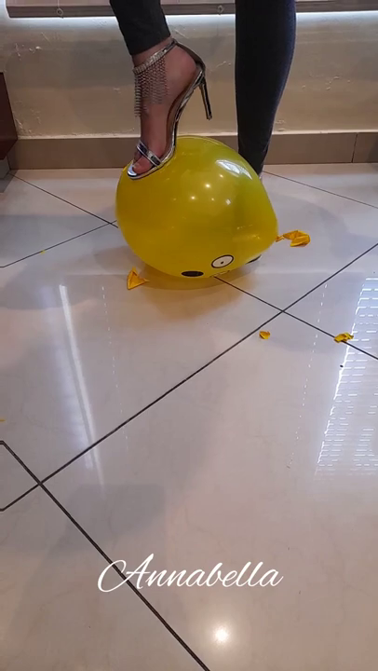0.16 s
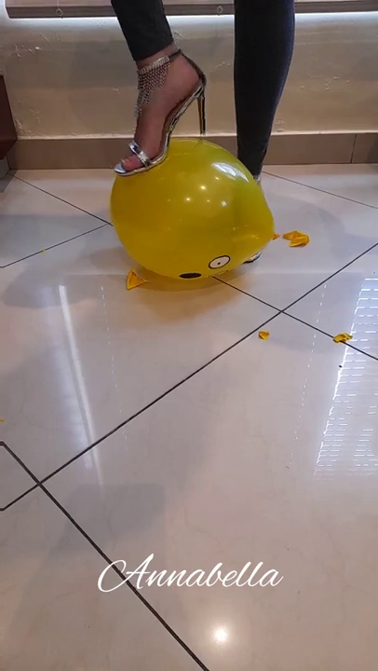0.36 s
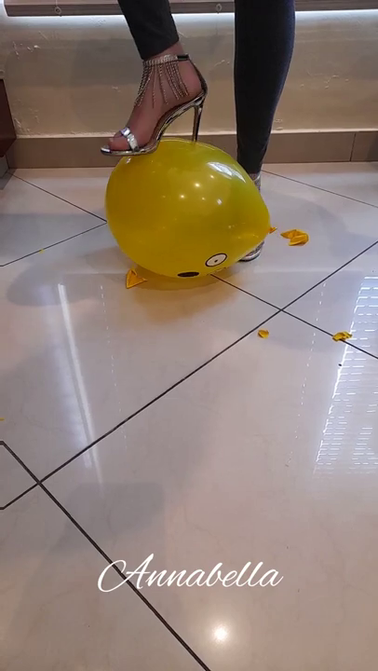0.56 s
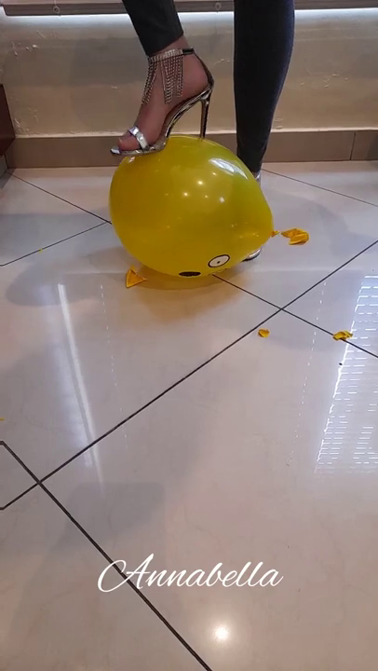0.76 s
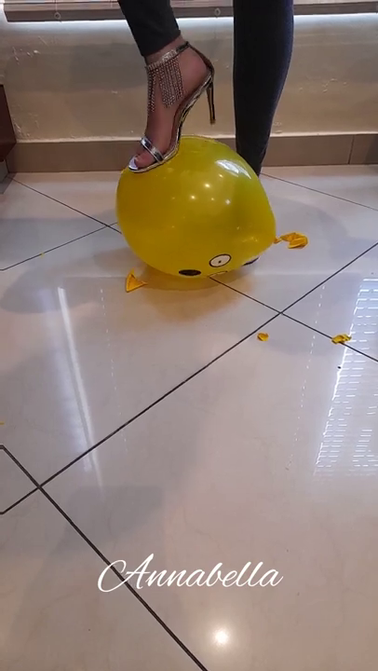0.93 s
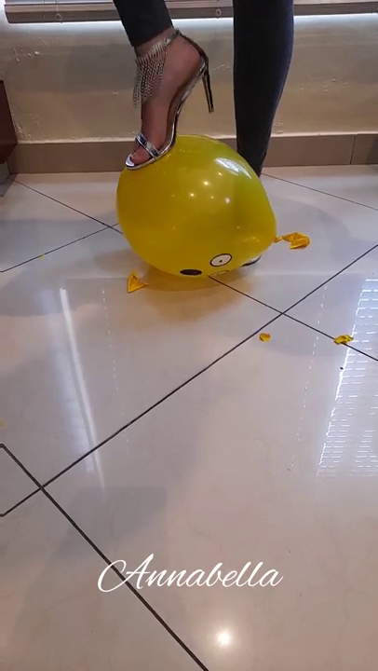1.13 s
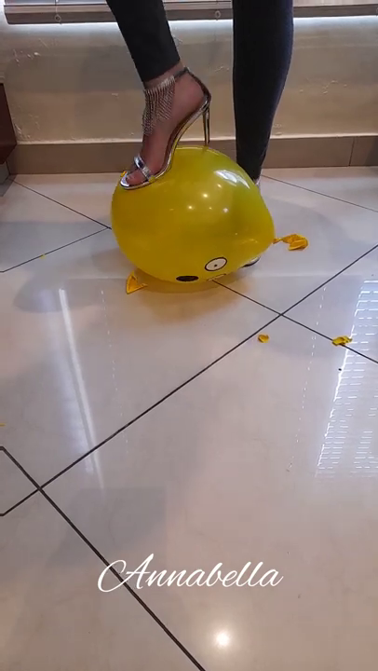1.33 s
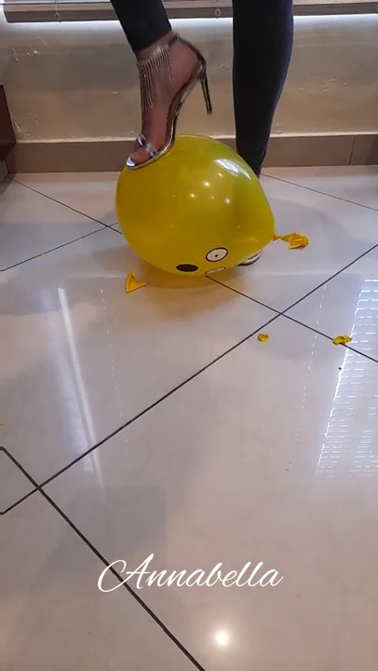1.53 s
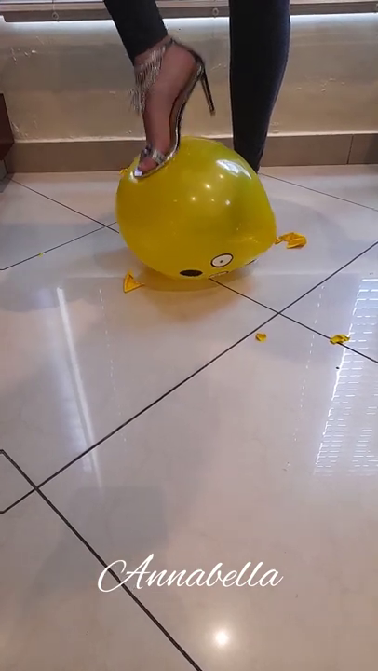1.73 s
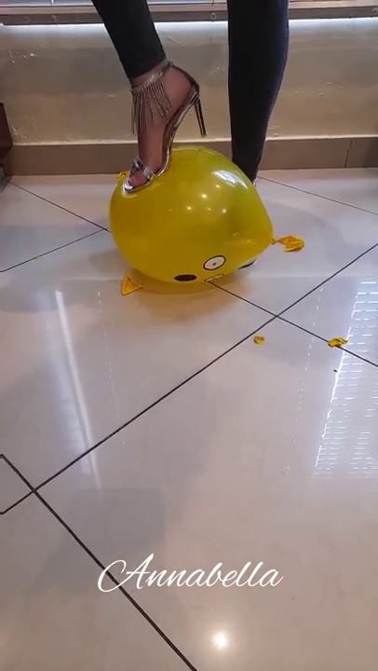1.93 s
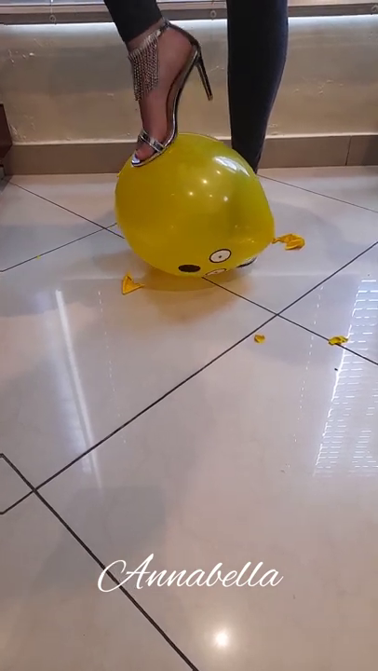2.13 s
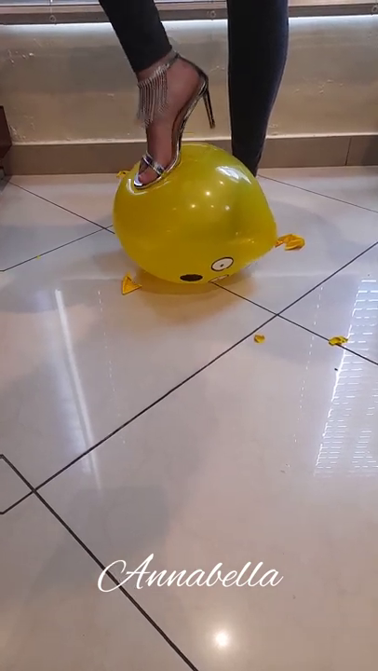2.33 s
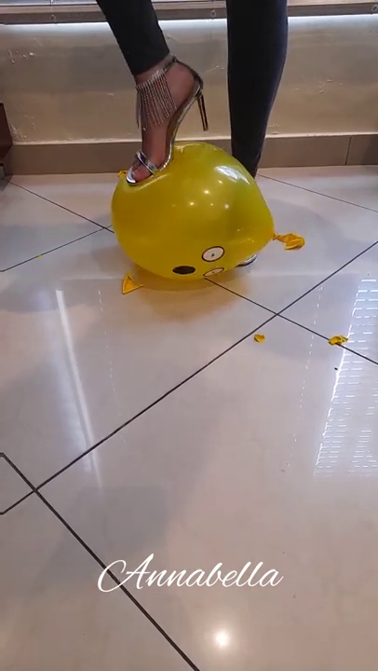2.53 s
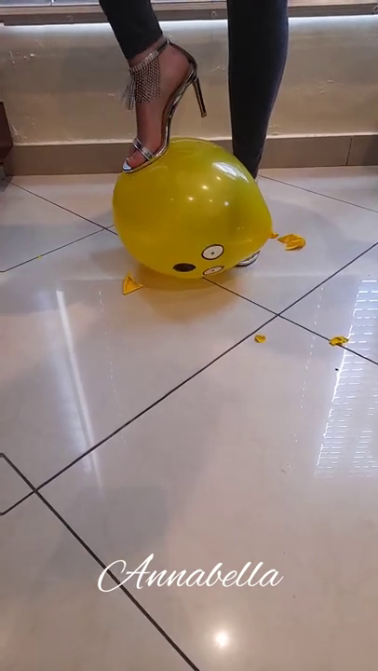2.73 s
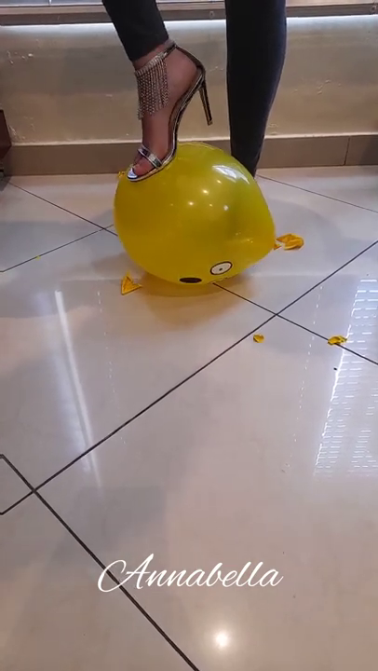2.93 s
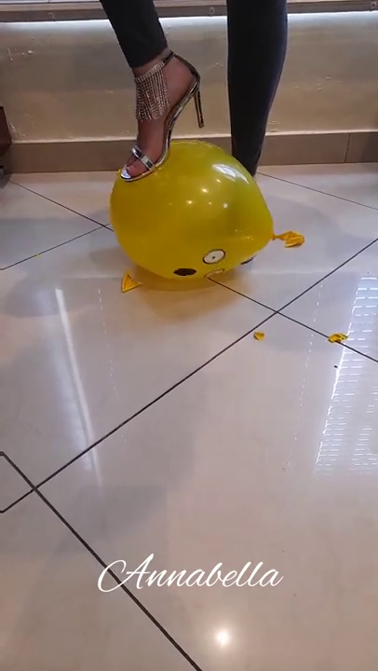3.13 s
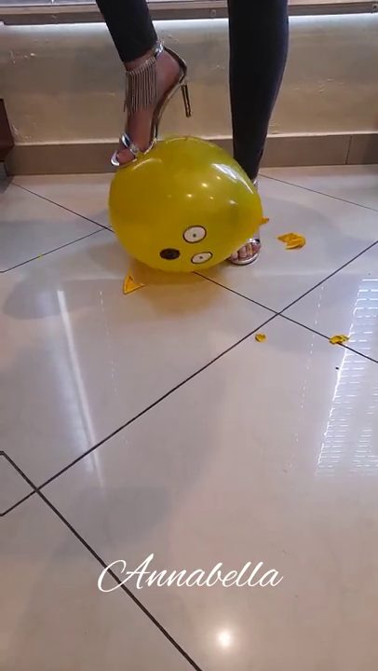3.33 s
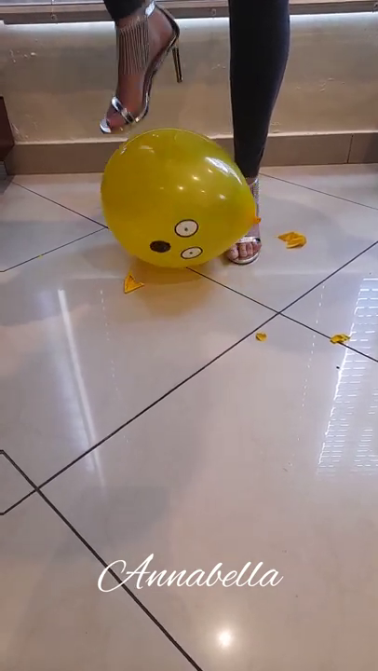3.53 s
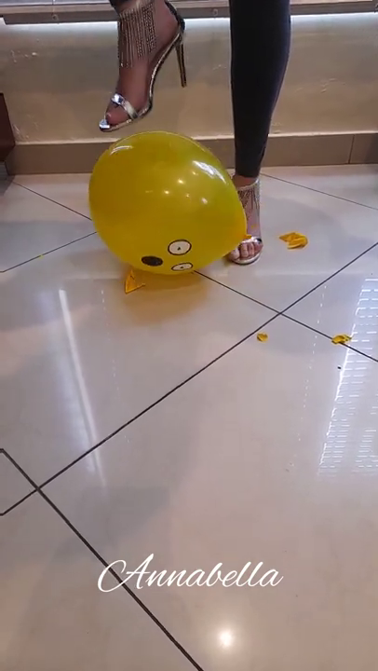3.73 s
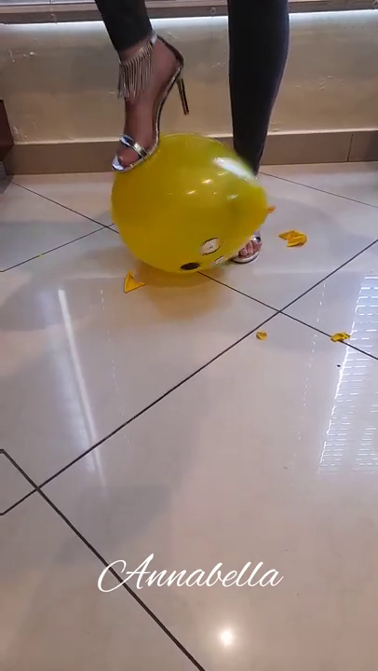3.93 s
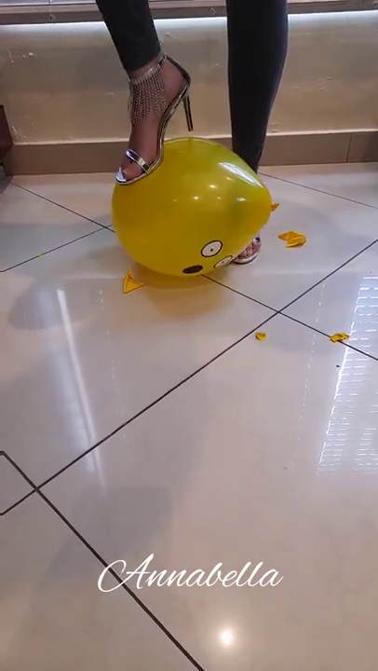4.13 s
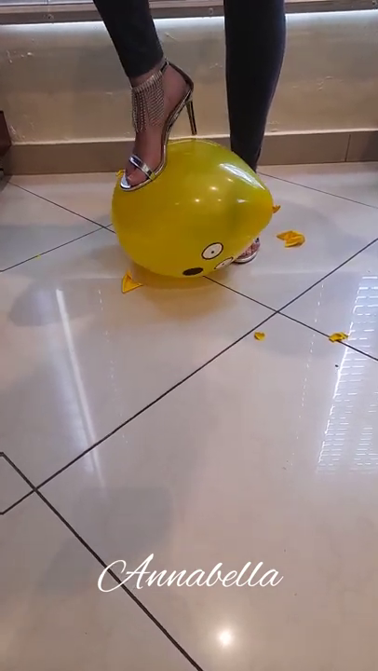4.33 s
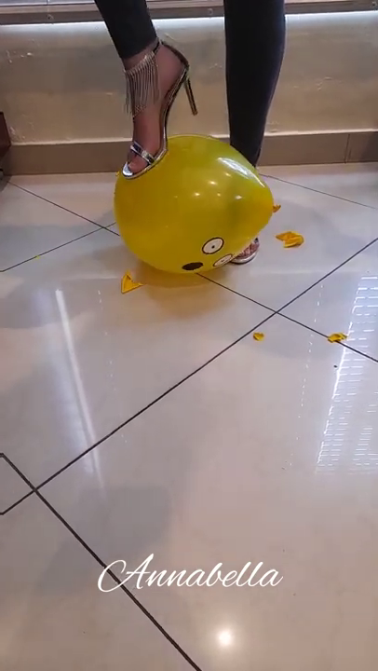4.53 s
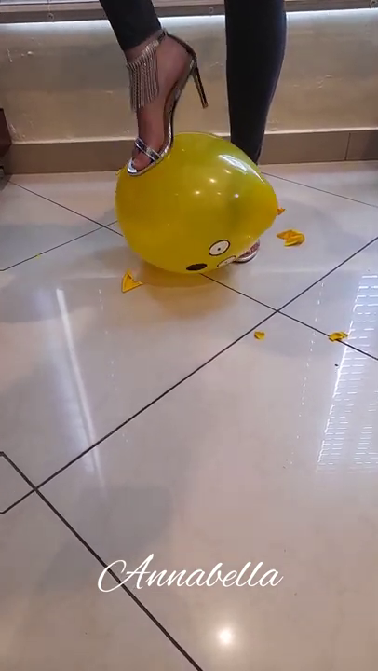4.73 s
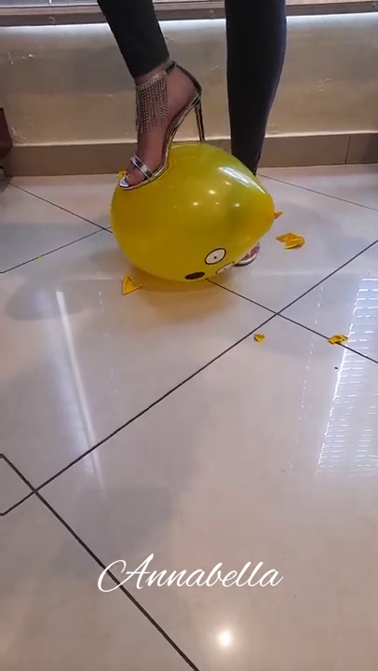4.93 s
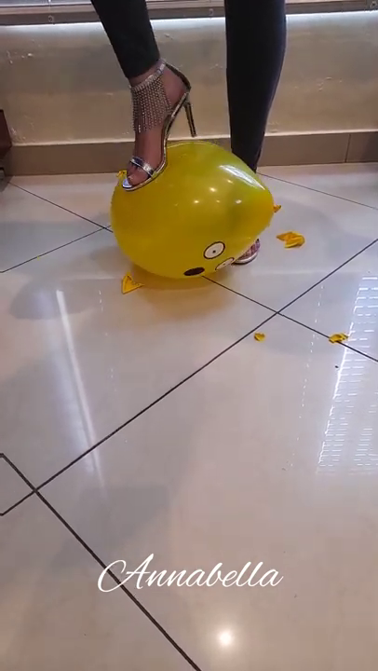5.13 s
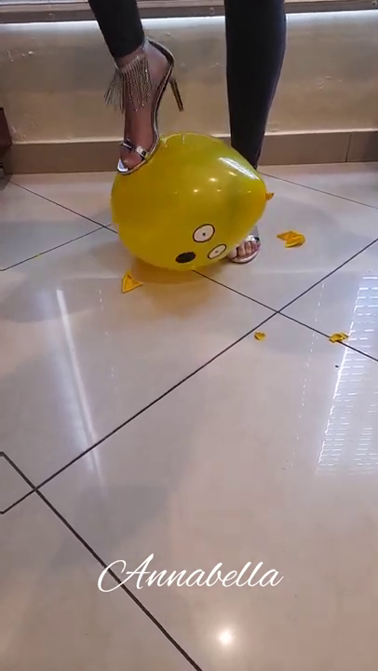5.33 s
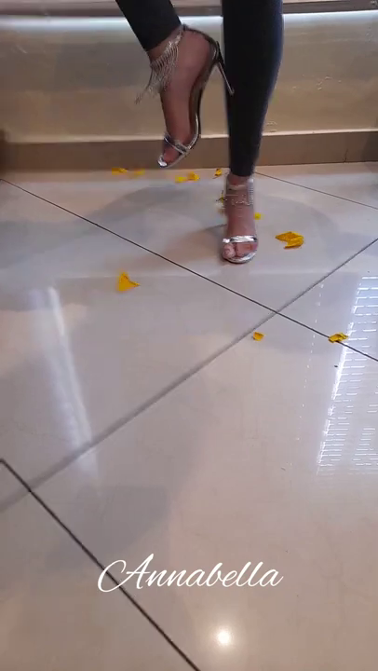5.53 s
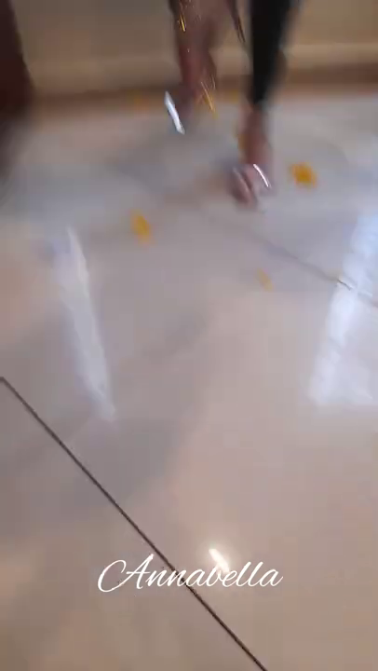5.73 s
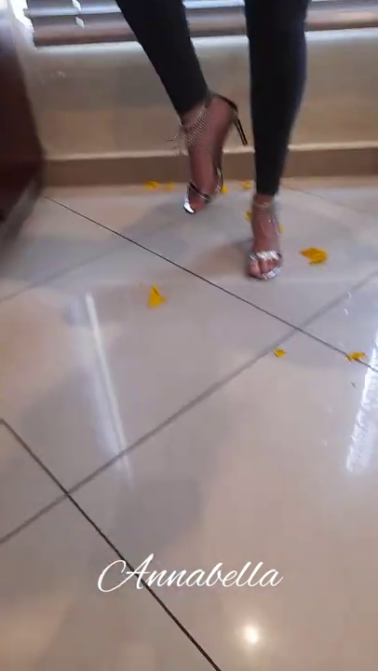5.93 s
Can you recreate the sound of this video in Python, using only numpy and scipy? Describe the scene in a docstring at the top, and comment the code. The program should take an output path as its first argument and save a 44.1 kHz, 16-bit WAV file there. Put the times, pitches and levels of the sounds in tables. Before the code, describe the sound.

In a hard, echoing tiled room, a shoe sole presses and rubs a tight balloon: faint low groans, rubbery stutters, dry crackles and little snaps come in uneven pushes. The other shoe knocks and scrapes the tiles midway, then the balloon is shoved with soft hollow thumps. More creaking leads to a sudden enormous pop, so loud the right side of the microphone blares and clips, followed by a ringing room tail.

```python
"""A high-heeled sandal kneads a latex balloon on a tile floor in a hard, echoing room.
Its sole sticks and slips: each slip kicks the skin's resonances (boom) and frees tiny noise grains (crackle).
The latex snaps, the other shoe knocks and grates on the tiles, and the sole shoves the balloon.
Then the balloon bursts: a pressure shock, swelling noise for the wall echoes, and a ringing room tail.
The burst overloads the right microphone, which blares as a clipped, wildly swinging tone."""
import sys
import numpy as np
from scipy import signal
from scipy.fft import rfft, irfft, next_fast_len
from scipy.io import wavfile
from scipy.ndimage import uniform_filter1d, map_coordinates

SR = 44100
rng = np.random.default_rng(int(sys.argv[2]) if len(sys.argv) > 2 else 0)


def pcm_store(signal):
    """Save signal as 16-bit PCM."""
    levels = np.round(np.clip(np.atleast_2d(signal), -1, 1) * 32767)
    wavfile.write(sys.argv[1], SR, levels.astype(np.int16).T)


N = 268128
POP_S = 5.5101  # the balloon bursts at this time

# pushes of the sole across the skin: t/s, length/s, boom level/dB, rub level/dB, crackle level/dB,
# fizz level/dB, first slip rate f/Hz, last slip rate f/Hz, looseness (0 clean groan to 1 ragged drag)
PUSHES = [(0.0, 0.096, -47.5, -51, -56, -66, 194.8, 196.2, 0.83),
          (0.338, 0.11, -63, -57, -66.5, -77.5, 215, 216, 0.79),
          (0.453, 0.082, -61, -56, -59.5, -74, 199.3, 189.8, .85),
          (0.53, 0.21, -51.5, -58.5, -74, -91, 184.8, 164.6, 0.71),
          (0.84, 0.085, -57, -59.5, -60, -73, 90, 90.1, 0.94),
          (0.916, 0.096, -46, -52.5, -59.5, -71, 200, 174.4, 0.69),
          (1.075, 0.14, -49.5, -47, -56.5, -71, 111.8, 112.1, .9),
          (1.295, 0.13, -41.5, -50.5, -54.5, -65, 199.8, 129.8, 0.5),
          (1.38, .23, -35.5, -50, -56, -66, 113.9, 115.9, 0.5),
          (1.58, 0.26, -51, -51, -55.5, -59.5, 105, 94.94, .85),
          (1.821, .21, -39.5, -50.5, -56.5, -65, 94.6, 89.87, 0.91),
          (2.09, .12, -46.5, -55.5, -60, -66, 79.2, 79, 0.49),
          (2.2, .13, -49.5, -47, -57.5, -66, 90, 100, .8),
          (2.34, 0.16, -39.5, -51.5, -57, -63.5, 114.7, 115, 0.59),
          (2.478, 0.16, -34, -48.5, -53, -59.5, 86.75, 93.97, 0.29),
          (2.60, .15, -34.5, -50.5, -53, -64, 114.5, 116.9, 0.42),
          (2.85, .2, -38.5, -48, -60, -68.5, 116, 114.8, 0.58),
          (3.15, .18, -39.5, -51.5, -57.5, -65, 83.92, 112.8, 0.47),
          (3.30, .15, -38.5, -49, -56.5, -66.5, 87.94, 90, .65),
          (3.498, .08, -51.5, -48.5, -56.5, -63.5, 124.8, 125, .9),
          (3.955, .085, -38, -50, -61, -61.5, 160, 130.4, 0.44),
          (4.02, .08, -31, -40.5, -50, -58, 60.14, 58.23, .9),
          (4.101, 0.079, -38.5, -45.5, -59, -67, 70, 69.92, 0.88),
          (4.221, 0.037, -48.5, -54.5, -55.5, -64, 75.14, 75.22, .9),
          (4.56, 0.17, -43, -52, -65.5, -78, 159.4, 185.9, .2),
          (4.645, 0.052, -33.5, -47, -48, -58, 172, 186.3, 0.25),
          (4.71, .11, -39.5, -51, -58, -66, 144.9, 135, 0.6),
          (4.881, .22, -43.5, -50, -53, -65.5, 77.83, 92, .9),
          (5.09, .115, -42, -48, -56.5, -68, 95.14, 110.1, .85),
          (5.19, 0.099, -31, -46.5, -47.5, -59.5, 116, 115.2, .55),
          (5.27, .14, -34.5, -50, -61, -72, 112, 140, 0.42),
          (5.411, 0.11, -49, -52.5, -65, -78, 139.3, 123.9, 0.43)]
# low resonances of the squeezed balloon: f/Hz, width/Hz, level/dB
BALLOON_MODES = [(67.4, 16.9, -4), (87.1, 17.5, -2.5), (115.8, 8.2, 3.5), (169, 38.4, -7.5), (212, 16, -11)]
# the balloon's higher overtones: f/Hz, width/Hz, level/dB
OVERTONE_MODES = [(219.3, 7, 2.5), (292.7, 10, -2.5), (322.8, 6.9, -5.5), (379.5, 9.2, -10.5),
                  (423, 6.6, 2.5), (523, 27, -4), (596, 13, -5.5), (634, 8.6, -6), (715, 5.3, -6),
                  (867, 16.6, -5.5)]
# colour of sole rubbing on latex: f/Hz, level/dB
RUB_COLOUR = [(160, -39), (230, -6), (320, 1.5), (400, -7), (560, -8.5), (820, -13), (1050, -35.5),
              (1600, -47)]
# dull colour of a knock, also used for the skin after a snap: f/Hz, level/dB
KNOCK_COLOUR = [(120, -28), (300, 5.5), (450, -6), (620, 1.5), (860, 1), (1050, -8.5), (1450, -10),
                (3000, -29), (9000, -48)]


def amp(db):
    """Turn decibels into a plain gain."""
    return 10 ** (np.asarray(db) / 20)


def unit(x):
    """Scale x to an average strength (rms) of 1."""
    return x / np.sqrt(np.mean(x ** 2) + 1e-20)


def along(points, hz):
    """Read a curve of (Hz, value) points, joined by straight lines on a log frequency axis."""
    point_hz, value = np.transpose(points)
    return np.interp(np.log(hz + 1), np.log(point_hz + 1), value)


def wobble(rate):
    """A smooth random curve with rate random points a second."""
    points = rng.standard_normal(int(N * rate / SR) + 4)
    return map_coordinates(points, [np.arange(N) * rate / SR])


def filtered(x, response):
    """Multiply each frequency of x by a complex response, with silent padding after the sound."""
    n = x.shape[-1]
    padded = next_fast_len(n + SR // 8, True)
    spectrum = rfft(x, padded) * response(np.fft.rfftfreq(padded, 1 / SR))
    return irfft(spectrum, padded)[..., :n]


def coloured(x, spectrum):
    """Give x a (Hz, dB) colour with a filter that responds only after its input."""
    def response(hz):
        cepstrum = irfft(np.log(amp(along(spectrum, hz))))
        # folding the second half onto the first puts the response after the input
        middle = len(cepstrum) // 2
        cepstrum[1:middle] *= 2
        cepstrum[middle + 1:] = 0
        return np.exp(rfft(cepstrum))
    return filtered(x, response)


def ringing(x, modes):
    """Pass x through resonances that ring longer the narrower they are; their signs alternate."""
    def response(hz):
        total = 0
        for k, (centre, width, db) in enumerate(modes):
            damping = 1j * hz * width
            total = total + (-1) ** k * amp(db) * damping / (centre * centre - hz * hz + damping)
        return total
    return filtered(x, response)


def paired(x):
    """Mix two unrelated signals into a microphone pair: alike in the bass, unrelated in the treble."""
    # left-right likeness: f/Hz, likeness (0-1)
    likeness = [(60, 0.85), (200, 0.84), (380, 0.19), (700, 0.11), (1300, 0.012)]

    def mid_and_side(hz):
        turn = np.arccos(np.clip(along(likeness, hz), -1, 1)) / 2
        return np.array([np.cos(turn), np.sin(turn)])
    mid, side = filtered(x, mid_and_side)
    return np.array([mid + side, mid - side])


def steady(x, size):
    """Even out the strength of x to about 1, as averaged twice over size samples."""
    power = np.mean(np.atleast_2d(x) ** 2, axis=0)
    smooth_power = uniform_filter1d(uniform_filter1d(power, size), size)
    return x / np.sqrt(np.abs(smooth_power) + 1e-6 * power.mean())


def add(track, s, sound):
    """Mix a sound into the track at s seconds."""
    part = track[..., round(s * SR):][..., :sound.shape[-1]]
    part += sound[..., :part.shape[-1]]


def room_tail():
    """Fresh stereo echo noise of energy about 1 a side; each frequency dies at its own speed."""
    # how long the room echoes: f/Hz, time to fall by 60 dB/s
    echo_times = [(60, 0.89), (300, 0.94), (900, 0.74), (2500, 0.89), (5000, 0.8), (8000, 0.66),
                  (12000, 0.58), (16000, 0.32)]
    hz, t, z = signal.stft(rng.standard_normal((2, SR * 3 // 5)), SR, nperseg=256)
    fading = z * amp(-60 * t / along(echo_times, hz)[:, None])
    tail = signal.istft(fading, SR, nperseg=256)[1]
    return paired(tail / np.linalg.norm(tail[0]))


def hit(spectrum, t60, wet_db, ring=0):
    """A fading noise contact (60 dB in t60 s) plus echo and woken overtones; its mono mix peaks at 1."""
    echo = room_tail()
    t = np.arange(echo.shape[1]) / SR
    contact = rng.standard_normal(echo.shape) * amp(-60 * t / t60)
    with_echo = paired(contact) + amp(wet_db) * np.linalg.norm(contact[0]) * echo
    sound = coloured(with_echo, spectrum)
    if ring:
        sound = sound + ring * ringing(sound, OVERTONE_MODES)
    return sound / np.abs(sound.mean(axis=0)).max()


def grains(spectrum, rate, spread_db, wet_db, gate):
    """Tiny random slips, about rate * gate a second, heard with the room and held at an even level."""
    happens = rng.random(N) < rate * gate / SR
    slips = happens * rng.standard_normal(N) * amp(spread_db * rng.standard_normal(N))
    direct = np.array([slips, np.roll(slips, 6)])  # the right side hears each slip 6 samples later
    echo = signal.fftconvolve(slips[None], room_tail(), axes=1)[:, :N]
    return steady(coloured(direct + amp(wet_db) * echo, spectrum), size=2200)


def envelope(s, length, release_db_per_s, arch_db):
    """The gain of one push: friction takes hold, arches over the length and dies away."""
    grip_s, softness_s = .024, 0.012  # half on after grip_s; softness sets how gradually
    span = slice(max(round(s * SR) - SR // 8, 0), min(round(s * SR) + SR, N))
    t = np.arange(span.start, span.stop) / SR - s
    attack = (1 + np.tanh((t - grip_s) / (2 * softness_s))) / 2
    off_centre = 2 * np.clip(t / length, 0, 1) - 1
    release_db = release_db_per_s * np.maximum(t - length, 0)
    gain = np.zeros(N)
    gain[span] = attack * amp(-arch_db * off_centre ** 2 - release_db)
    return gain


def strength(levels_db, release_db_per_s, arch_db):
    """The gain of one layer over all the pushes; where they overlap their powers add."""
    power = 0
    for (s, length, *_), db in zip(PUSHES, levels_db):
        power = power + (amp(db) * envelope(s, length, release_db_per_s, arch_db)) ** 2
    return np.sqrt(power)


def room_noise():
    """A low, steady noise of the room: coloured random noise."""
    # colour of the room noise: f/Hz, level/dB
    noise_colour = [(18, -62), (30, -27), (81, -3.5), (192, -16.5), (379, -10), (410, -4), (532, -12),
                    (921, -23), (3320, -32.5), (12600, -32), (15500, -24.5)]
    noise = paired(rng.standard_normal((2, N)))
    return amp(-72.5) * unit(coloured(noise, noise_colour))


def slipping():
    """Slip rate (Hz) and looseness follow the latest push to take hold; the rate glides first to last."""
    start, length, *_, first_hz, last_hz, loose = np.transpose(PUSHES)
    t = np.arange(N) / SR
    push = np.maximum(np.searchsorted(start + .024, t) - 1, 0)  # a push takes hold 24 ms in
    progress = np.clip((t - start[push]) / length[push], 0, 1)
    rate = first_hz[push] + (last_hz - first_hz)[push] * progress
    return uniform_filter1d(np.array([rate, np.clip(loose[push], 0, 1)]), size=1000)


def kneading(jitter=.14, scatter_db=5, swing=0.59, drag_db=-2, overtones_db=1, harmonics_db=3):
    """Stick-slip friction: each slip of the sole kicks the balloon and tears loose tiny contacts."""
    # colour of the crackle: f/Hz, level/dB
    crackle_colour = [(600, -27.5), (1000, 2), (1300, -1.5), (1800, 2), (2400, -1.5), (3000, -7),
                      (3600, -8.5), (4400, -4.5), (5500, -14.5), (7000, -16), (10000, -48)]
    # colour of the fizz, the highest friction noise: f/Hz, level/dB
    fizz_colour = [(4000, -5.5), (6500, -2.5), (9000, -4.5), (12000, 1.5), (13500, -2), (15800, -11.5)]
    _, _, boom_db, rub_db, crackle_db, fizz_db, *_ = np.transpose(PUSHES)
    slip_hz, loose = slipping()
    cycles = np.cumsum(slip_hz * np.exp(jitter * loose * wobble(70))) / SR
    # one kick per slip, more uneven when loose
    kicks = np.diff(np.floor(cycles), prepend=0) * amp(scatter_db * loose * rng.standard_normal(N))
    drag = paired(rng.standard_normal((2, N)))

    # boom: the skin swings with the slips while its resonances ring on
    sway = swing * np.sin(2 * np.pi * cycles) * amp(3.2 * loose * wobble(35))
    kicked = .5 * steady(ringing(kicks, BALLOON_MODES), size=4000)
    dragged = amp(drag_db) * loose * unit(ringing(drag, BALLOON_MODES))
    boom = steady(kicked + sway + dragged, size=1800)

    # rub: loose grains, ringing overtones and the gliding harmonics of the slips
    gate = 1 + np.cos(2 * np.pi * cycles)  # bunches the grains around each slip
    rub = grains(RUB_COLOUR, rate=500, spread_db=3.5, wet_db=3.5, gate=gate)
    rub = rub + amp(overtones_db) * unit(ringing(drag, OVERTONE_MODES))
    harmonics = steady(coloured(kicks, RUB_COLOUR), size=4000)
    cleanness = 2 ** (1 - 2 * loose)  # clean groans carry stronger harmonics
    rub = steady(rub + amp(harmonics_db) * cleanness * harmonics, size=2200)

    grip = amp(1.07 * wobble(28))  # the grip tightens and gives
    crackle = grip * grains(crackle_colour, rate=500, spread_db=3.0, wet_db=11.0, gate=gate)
    fizz = grip * grains(fizz_colour, rate=1200, spread_db=5, wet_db=4, gate=gate)

    # the last factor of each layer trims left and right, in dB
    boom = boom * strength(boom_db, release_db_per_s=141, arch_db=3.5) * amp([[-1], [1]])
    rub = rub * amp(1.24 * wobble(22))
    rub = rub * strength(rub_db, release_db_per_s=155, arch_db=2.0) * amp([[-.5], [2]])
    crackle = crackle * strength(crackle_db, release_db_per_s=155, arch_db=3.0) * amp([[1], [3.5]])
    fizz = fizz * strength(fizz_db, release_db_per_s=153, arch_db=3.5) * amp([[3], [2]])
    return boom + rub + crackle + fizz


def snaps():
    """The latex snaps free of the sole: a bright noise burst and a duller one from the skin."""
    # snaps, levels before the left-right trim: t/s, snap level/dB, skin level/dB
    snap_times = [(0.181, -64, -66), (0.476, -58, -60), (0.859, -64, -52.5), (0.945, -50, -48),
                  (1.1, -49.5, -54), (1.138, -66, -60), (1.651, -62, -62), (2.194, -44, -51),
                  (2.396, -44, -48), (2.719, -47, -44), (3.188, -54, -58), (4.042, -41, -33.5),
                  (4.483, -67.5, -75), (4.596, -62, -49), (4.829, -47.5, -47), (4.883, -45, -43),
                  (4.941, -46, -45.5), (5.097, -48, -39)]
    # bright colour of a snap: f/Hz, level/dB
    snap_colour = [(400, -28.5), (1800, 3.5), (3300, -3), (4500, -4), (8000, -11.5), (12000, -9.5),
                   (16000, -11.5)]
    out = np.zeros((2, N))
    for s, snap_db, skin_db in snap_times:
        add(out, s, amp(snap_db) * hit(snap_colour, t60=.06, wet_db=4))
        add(out, s, amp(skin_db) * hit(KNOCK_COLOUR, t60=0.07, wet_db=-2))
    return out * amp([[-1], [1]])


def steps():
    """The standing shoe meets the tiles: a knock that wakes the balloon's overtones, and a click."""
    # contacts of the shoe, levels before the left-right trim: t/s, knock level/dB, click level/dB
    step_times = [(2.826, -40, -51), (2.832, -33, -44), (2.841, -33, -39), (2.853, -32.5, -39.5),
                  (2.879, -47, -38), (2.892, -35.5, -32.5), (2.910, -47, -38)]
    # colour of the click: f/Hz, level/dB
    click_colour = [(300, -28), (900, 8.5), (1450, 10), (2400, 8), (3000, 1.5), (4400, -2), (7000, -19),
                    (15000, -21)]
    out = np.zeros((2, N))
    for s, knock_db, click_db in step_times:
        add(out, s, amp(knock_db) * hit(KNOCK_COLOUR, t60=0.057, wet_db=-8.0, ring=4.34))
        add(out, s, amp(click_db) * hit(click_colour, t60=0.06, wet_db=-5))
    return out * amp([[-1], [1]])


def scuff(start_s=2.868, length_s=0.061, level_db=-43):
    """The standing shoe slides to rest, grating over the tiles in many tiny slips."""
    # colour of the grating: f/Hz, level/dB
    grate_colour = [(300, -20), (600, 1), (900, 0.5), (1500, 4.5), (2300, 1), (3200, -5), (4400, -10),
                    (7000, -19), (12000, -43)]
    slide = amp(level_db) * envelope(start_s, length_s, release_db_per_s=162, arch_db=0.5)
    grating = grains(grate_colour, rate=900, spread_db=6.5, wet_db=9, gate=1)
    return slide * grating * amp([[0], [2]])


def shoves():
    """The sole lands and shoves the balloon: its low resonances thump under a short slap of noise."""
    # shoves, levels before the left-right trim: t/s, boom level/dB, slap level/dB
    shove_times = [(3.957, -33, -43.5), (4.012, -29.5, -55), (4.046, -29, -40), (4.066, -33, -44),
                   (4.087, -30, -51)]
    thump = ringing(signal.unit_impulse(SR // 2), BALLOON_MODES)
    out = np.zeros((2, N))
    for s, boom_db, slap_db in shove_times:
        add(out, s, amp(boom_db) * thump / np.abs(thump).max())
        add(out, s, amp(slap_db) * hit(RUB_COLOUR, t60=0.038, wet_db=-22))
    return out * amp([[-1], [1]])


def pop(shock_s=0.00092, swell_s=0.042, swell_db=-18, rip_db=-11, rip_t60=0.068, tail_db=-23):
    """The skin rips and frees a pressure shock; wall echoes pile up, then the room rings out."""
    # colour of the rip and the wall echoes: f/Hz, level/dB
    burst_colour = [(40, -12.5), (170, -9.5), (310, 13.5), (550, 3), (750, -5), (1000, -7.5), (1500, -5.5),
                    (2500, 1), (4000, -4.5), (8000, -12), (12500, -10.5), (16000, -15)]
    # colour of the room's tail: f/Hz, level/dB
    tail_colour = [(40, -32), (100, -1), (190, 0.5), (330, 0), (560, -0.5), (950, -10.5), (1400, -6.5),
                   (2150, -2), (2700, -4), (3300, -9), (4400, -9), (8000, -17), (12500, -23), (16000, -24)]
    # the room's lingering low tones, before filling and trim: f/Hz, level/dB, time to fall by 60 dB/s
    room_tones = [(205, -30, 1.2), (278, -27.5, 1.15), (316, -27, 0.8), (339, -24.5, .9), (374, -28, 0.77),
                  (565, -35.5, 0.96)]
    echo = coloured(room_tail(), tail_colour)
    t = np.arange(echo.shape[1]) / SR

    def rush():
        return unit(coloured(paired(rng.standard_normal(echo.shape)), burst_colour))

    # u counts shock lengths since arrival; the shock reaches the left microphone 0.3 ms earlier
    u = np.maximum(t - np.array([[0], [.0003]]), 0) / shock_s
    shock = (1 - u) * np.exp(-u / 0.94) * (1 - np.exp(-u / 0.2))  # pressure, then suction
    rip = amp(rip_db - 60 * t / rip_t60) * (1 - np.exp(-u)) * rush()
    swell = (t / swell_s * np.exp(1 - t / swell_s)) ** 3  # peaks at swell_s
    walls = amp(swell_db) * swell * rush() * amp([[-1.5], [.3]])
    tail = amp(tail_db) * echo / echo[:, :SR // 10].std() * amp([[-1], [1]])
    ring = 0
    for hz, db, t60 in room_tones:
        tone = np.sin(2 * np.pi * (hz * t + rng.random((2, 1))))
        ring = ring + amp(db - 60 * t / t60) * tone
    fill = 1 - np.exp(-t / 0.085)  # the room takes a moment to fill with sound
    out = np.zeros((2, N))
    add(out, POP_S, shock + rip + walls + fill * (tail + ring * amp([[-4], [1.5]])))
    return out


def blare(top=0.52, thud_db=-15, rasp_db=-7.5):
    """The overloaded right microphone swings wildly against its limit, lower overall, then collapses."""
    # path of the blare: t/s, centre f/Hz (each swing strays from it), drive level/dB
    path = [(5.512, 2399, -21), (5.54, 2151, -10.5), (5.585, 1749, -1.5), (5.619, 1202, -5),
            (5.624, 201, -2), (5.631, 719.6, -1), (5.648, 750, -3), (5.66, 338.6, -5.5), (5.681, 581, 2.5),
            (5.69, 111, -9.5), (5.703, 58, -16), (5.745, 50, -67)]
    s, path_hz, path_db = np.transpose(path)
    t = np.arange(N) / SR
    centre_hz = np.interp(t, s, path_hz)
    drive_db = np.interp(t, s, path_db)
    cycles = np.cumsum(centre_hz) / SR

    def chance(count):
        """A smooth random curve with count random points per swing."""
        points = rng.standard_normal(int(cycles[-1] * count) + 4)
        return map_coordinates(points, [cycles * count])

    pace = np.exp(.85 * np.tanh(chance(count=2)) - .14)
    size = amp(3.5 * chance(count=1))
    swing = size * np.sin(2 * np.pi * np.cumsum(centre_hz * pace) / SR)
    rasp = amp(rasp_db) * chance(count=4)
    low_noise = coloured(rng.standard_normal(N), [(30, -30), (70, 5.5), (300, 0.0), (700, -33), (3000, -66.0)])
    thud = amp(thud_db) * unit(low_noise)
    clipped = top * np.tanh(amp(drive_db) * (swing + rasp + thud))
    clipped = clipped * (np.arange(N) > POP_S * SR)
    return coloured(clipped, [(20, -23), (55, 3), (3000, -1.0), (5000, -2.5), (10000, -3)])


def scene():
    """Kneading stops at the pop, the blare is on the right only, and room noise lies under everything."""
    intact = np.arange(N) < POP_S * SR
    out = room_noise() + kneading() * intact + snaps() + steps() + scuff() + shoves() + pop()
    out[1] += blare()
    return out


def record(dry, ceiling=.72, top_hz=15850):
    """The recorder rounds off peaks towards a ceiling and cuts steeply above top_hz."""
    clipped = dry / (1 + np.abs(dry / ceiling) ** 6) ** (1 / 6)
    return filtered(clipped, lambda hz: 1 / (1 + (hz / top_hz) ** 200))


dry = scene()
out = record(dry)
pcm_store(out)
```